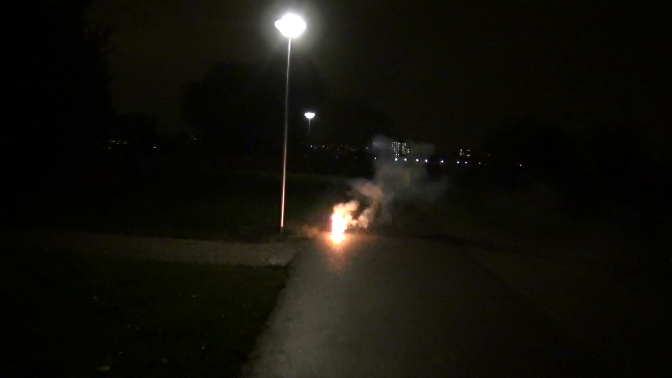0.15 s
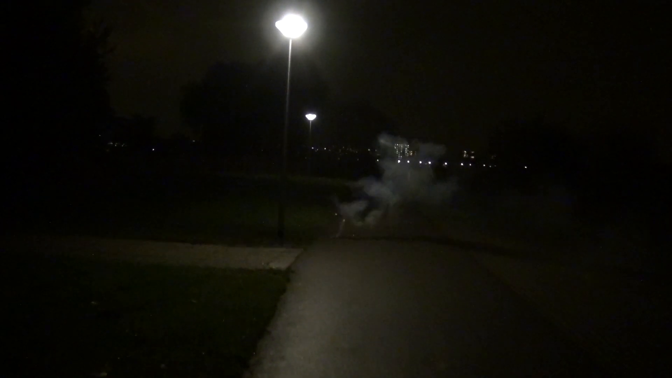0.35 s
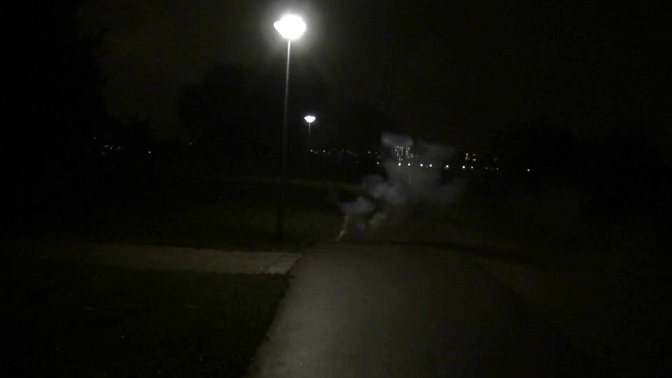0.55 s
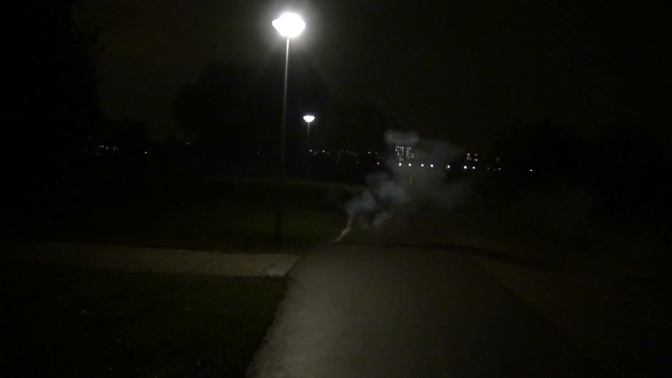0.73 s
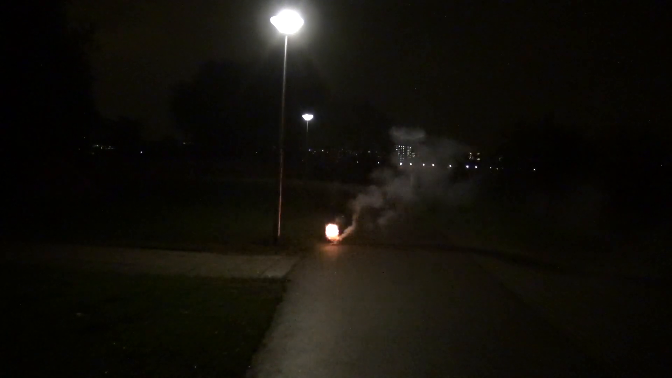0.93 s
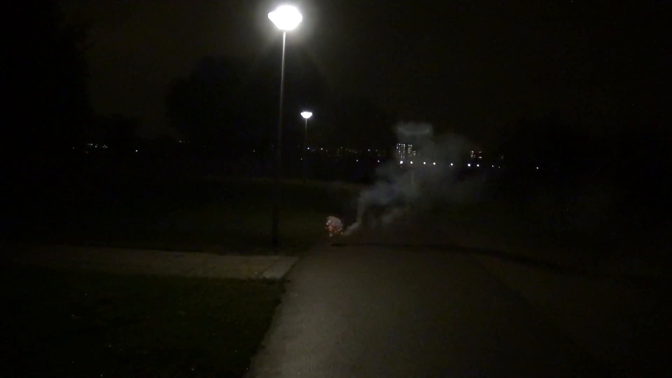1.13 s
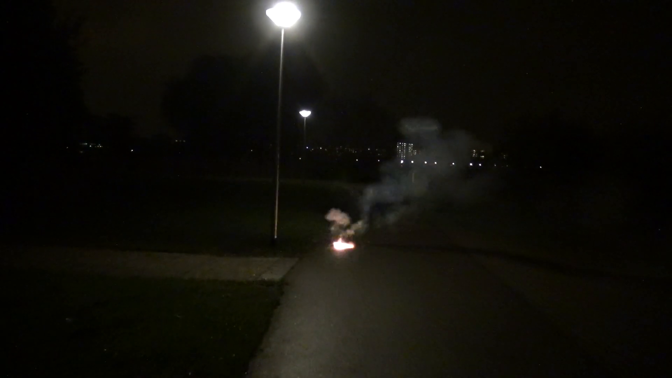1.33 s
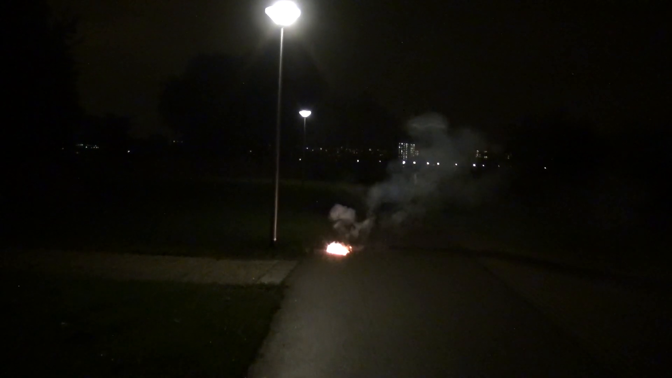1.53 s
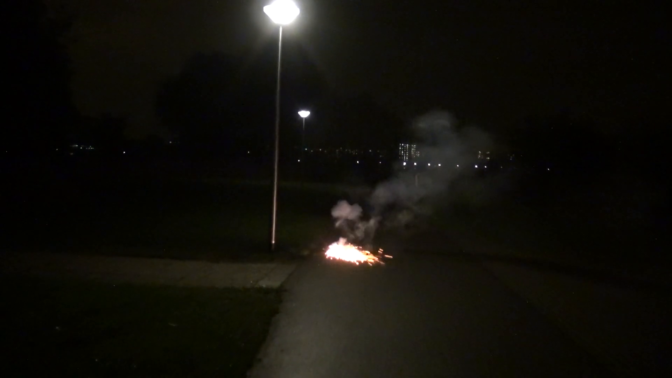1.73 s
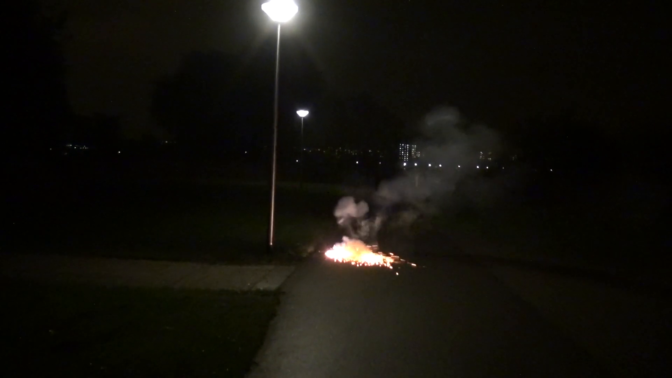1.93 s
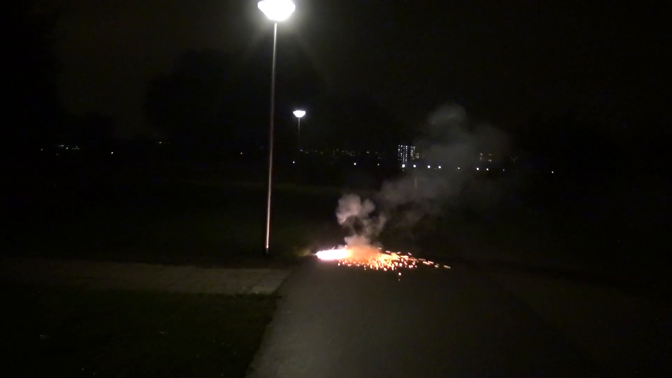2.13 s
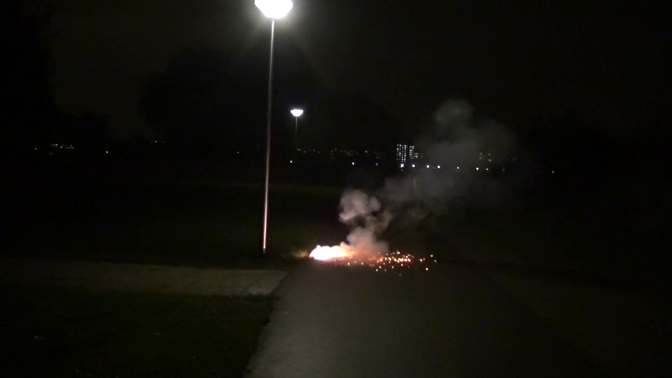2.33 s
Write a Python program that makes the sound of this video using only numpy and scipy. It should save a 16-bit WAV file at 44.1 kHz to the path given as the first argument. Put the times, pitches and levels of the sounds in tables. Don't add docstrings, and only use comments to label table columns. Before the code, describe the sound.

A firecracker bangs outdoors at night, a few metres from a stereo microphone. Faint distant traffic, light wind and the last echo of an earlier bang open it. Sharp, clipped cracks hit at 0.22, 0.92 and 1.42 seconds, each with a tick of grit, fast slapback and weaker far echoes. From 1.44 burning powder roars, strongest around 1.8 to 2.0, a dull pop at 1.93, spitting brighter near 2.08, then dying.

```python
import sys
import numpy as np
from scipy import signal
from scipy.fft import rfft, irfft, next_fast_len
from scipy.io import wavfile
from scipy.ndimage import uniform_filter1d

SR = 44100
rng = np.random.default_rng(int(sys.argv[2]) if len(sys.argv) > 2 else 0)


def nominal_scale(level):
    x = np.asarray(level, float) / 20
    return 10 ** x


def master(y):
    cut = np.clip(np.atleast_2d(y).T, -1, 1)
    pcm = np.round(cut * 32767)
    wavfile.write(sys.argv[1], SR, pcm.astype(np.int16))


N = 105840
LEAD = int(.4 * SR)


def colour(x, points):
    p, size = np.array(points), next_fast_len(x.shape[-1])
    hz = np.maximum(np.arange(size // 2 + 1) * SR / size, 1)
    gain = nominal_scale(np.interp(np.log(hz), np.log(p[:, 0]), p[:, 1]))
    return irfft(rfft(x, size) * gain, size)[..., :x.shape[-1]]


def unit(x):
    return x / np.sqrt(np.mean(x ** 2))


def pan(db):
    return nominal_scale(np.array([db, -db]) / 2)


def pair(mid, side, alike):
    c = np.clip(alike, 0, 1)
    return (np.sqrt(1 + c) * mid + np.sqrt(1 - c) * side * np.array([[1], [-1]])) / np.sqrt(2)


def walk(hz):
    hold = int(SR / hz)
    steps = np.repeat(rng.standard_normal(N // hold + 1), hold)
    return unit(uniform_filter1d(uniform_filter1d(steps, hold), hold)[:N])


def grains(count, spread_db, share=1.):
    size_draw, sounds_draw = rng.random((count, 2)).T
    sizes = nominal_scale(-spread_db * np.log(1 - size_draw))
    return unit(rng.standard_normal(count) * sizes * (sounds_draw < share))


# f/Hz, level/dB per Hz
NIGHT_COLOUR = [(25, -13.5), (130, 0.5), (200, -11), (280, -15.5), (450, -18), (1000, -16), (2600, -33),
                (15500, -51)]


def night():
    level_db, alike_hz, drift_db, drift_hz = -39.5, 2780, .8, 6.8
    out, base = 0, rng.standard_normal((2, N))
    for hz in 40 * 2. ** np.arange(9):
        top_hz = min(hz * np.sqrt(2) * (1 + (hz > 9e3)), 2e4)
        octave = signal.butter(2, [hz / np.sqrt(2), top_hz], "band", fs=SR, output="sos")
        band = signal.sosfilt(octave, base)
        alike = 1 / (1 + hz / alike_hz) - .08
        out = out + pair(band[0], band[1], alike) * nominal_scale(drift_db * walk(drift_hz))
    return unit(colour(out, NIGHT_COLOUR)) * nominal_scale(level_db)


def wind():
    level_db, top_hz, gust_db, gust_hz = -41, 60.5, 2, 3.5
    low = signal.sosfilt(signal.butter(2, top_hz, fs=SR, output="sos"), rng.standard_normal((2, N)))
    return unit(low) * nominal_scale(level_db + gust_db * walk(gust_hz))


# delay t/s, level/dB, left-right level/dB
SCATTER = [(.003, -17.5, 4), (0.029, -30, 18.5), (0.041, -14, 7.5), (0.063, -16, 5.5), (.15, -23.5, 4),
           (0.236, -28.5, 3), (0.254, -35.5, 3), (.34, -38.5, 1), (0.368, -36, 1.5), (.7, -46, -2.5)]
# f/Hz, level/dB
SCATTER_COLOUR = [(60, -15), (200, -9), (450, -4.5), (1000, -3), (2200, 10), (5000, 2.5), (10000, 0),
                  (15000, -15)]
ECHO_DELAYS = [.0123, .0160, .0228, .0330, .0465, .0790, .0840, .1045, .1460, .1820, .3595, .3960, .4025,
               .4290, .0838]
# level/dB, left-right level/dB, low edge f/Hz, high edge f/Hz, smear t/s
ECHOES = [(-2, -6, 1300, 8600, 0.000032), (-22, 5, 920, 7200, 0.000085), (-21, -28, 2600, 9700, 0.00023),
          (-17.5, -14, 46, 670, 0.00017), (-12, 4, 670, 1330, 0.0027), (-4.5, -10, 1040, 4400, 0.0036),
          (-8.5, 17, 123, 7500, 0.00085), (-9.5, 8, 1200, 6900, .001), (-5.5, 1, 1040, 7100, 0.0024),
          (-5, 5.5, 420, 2600, 0.0041), (-17, 1, 690, 4100, 0.0027), (-16.5, 2, 1400, 2400, 0.00085),
          (-21, 1, 1100, 1500, 0.0011), (-27.5, -13, 700, 2700, 0.0026), (-9.5, 3, 90, 520, 0.000044)]


def space():
    scatter_db, grain_db, alike, air_db_per_s_khz = -20.5, 1.8, 0.58, 0.77
    size = int(.8 * SR)
    t, s = np.arange(size) / SR, np.array(SCATTER)
    noise = colour(pair(grains(size, grain_db), grains(size, grain_db), alike), SCATTER_COLOUR)
    hz, at, z = signal.stft(noise, SR, nperseg=256)
    air = nominal_scale(-air_db_per_s_khz * np.outer(hz / 1000, at))
    noise = signal.istft(z * air, SR, nperseg=256)[1][:, :size]
    level = nominal_scale(np.interp(t, s[:, 0], s[:, 1], left=-99) + scatter_db)
    out = noise * level * pan(np.interp(t, s[:, 0], s[:, 2]))
    for delay_s, (db, pan_db, lo_hz, hi_hz, smear_s) in zip(ECHO_DELAYS, ECHOES):
        k = int(round(delay_s * SR))
        rough = rng.standard_normal(1024) * np.exp(-t[:1024] / smear_s)
        click = rough / np.sqrt(np.sum(rough ** 2)) * .45
        click[0] += 1 / np.sqrt(1 + smear_s / .0005)
        echo = signal.lfilter(*signal.butter(2, [lo_hz, hi_hz], "band", fs=SR), click)
        out[:, k:k + 1024] += nominal_scale(db) * np.outer(pan(pan_db), echo)
    return out


DEBRIS_TIMES = [
    .2226,
    .9243,
    .9272,
    1.4142,
    1.4178,
    1.4200,
]
# level/dB, decay t/s, dullness 0-1
DEBRIS = [(-2.5, .002, 0.41), (5, 0.0017, 0.73), (-1, 0.00082, 0.95), (1, 0.00072, 1), (3, 0.0019, 0.74),
          (3.5, 0.0045, 0.81)]


def debris():
    out, t = np.zeros((2, N)), np.arange(1500) / SR
    for s, (db, decay_s, dull) in zip(DEBRIS_TIMES, DEBRIS):
        k, pole = int(s * SR), min(dull, .95)
        grit = pair(*rng.standard_normal((2, 1500)), .55)
        out[:, k:k + 1500] += nominal_scale(db) * signal.lfilter([1 - pole], [1, -pole], grit) * np.exp(-t / decay_s)
    return signal.lfilter(*signal.butter(2, 700, "high", fs=SR), out)


FIZZ_TIMES = [1.44, 1.59, 1.71, 1.82, 1.96, 1.985, 2.075, 2.118, 2.14, 2.22, 2.4]
# roar level/dB, spitting level/dB over the roar
FIZZ_LEVELS = [(-31.5, 0), (-30.5, -12.5), (-28, -8.5), (-24, -16.5), (-24, -12), (-24.5, -8.5), (-27, -3),
               (-26.5, -8), (-30.5, -11), (-33.5, -16), (-40.5, -15)]
# f/Hz, level/dB per Hz
ROAR_COLOUR = [(35, -34), (60, -16), (146, -7), (182, -0.5), (306, -2), (665, 0), (1470, -4.5), (5000, -59),
               (6500, -60), (11000, -120)]
# f/Hz, level/dB per Hz
SPIT_COLOUR = [(600, 6), (2000, 10.5), (3500, 2.5), (8000, -6.5), (11000, -13), (13000, -22), (16000, -32)]
# t/s, level/dB, f/Hz
POP = (1.928, -13, 220)


def puffs():
    return grains(N, 1.3, 3000 / SR) + 0.94 * rng.standard_normal(N)


def fizz():
    flicker_db, flicker_hz, roar_db, spit_db, spit_grain_db = .9, 60, 0, 3, 1.2
    ember_db, ember_hz, pop_decay_s = -53, 7000, .0016
    t, levels = np.arange(N) / SR, np.array(FIZZ_LEVELS)
    lit = np.clip((t - FIZZ_TIMES[0] + .02) / .03, 0, 1)
    hiss = signal.lfilter(*signal.butter(1, ember_hz, "high", fs=SR), rng.standard_normal((2, N)))
    embers = nominal_scale(ember_db) * lit * hiss
    burning = lit * nominal_scale(np.interp(t, FIZZ_TIMES, levels[:, 0]) + flicker_db * walk(flicker_hz))
    roar = unit(colour(pair(puffs(), puffs(), 0.99), ROAR_COLOUR))
    spit = unit(colour(pair(grains(N, spit_grain_db), grains(N, spit_grain_db), 0.97), SPIT_COLOUR))
    spitting = nominal_scale(spit_db + np.interp(t, FIZZ_TIMES, levels[:, 1])) * spit
    pop_s, pop_db, pop_hz = POP
    late = np.maximum(t - pop_s, 0)
    pop = -nominal_scale(pop_db) * np.sin(2 * np.pi * pop_hz * late) * np.exp(-late / pop_decay_s)
    return burning * (nominal_scale(roar_db) * roar + spitting) + pop + embers


BANG_TIMES = [
    -.335,
    .2223,
    .9240,
    1.4197,
]
# crack level/dB, crack ring f/Hz, thump level/dB, snap level/dB
BANGS = [(-2, 1270, -3, 4.5), (1, 1180, -2, 6.5), (4, 1260, -9, 13), (-2.5, 470, -15, -2)]


def bangs(thump_gain_db, crack_gain_db):
    crack_s, snap_s = .00075, .0001
    under_ratio, under_db, under_s = 0.66, -2, 0.00077
    thump_hz, thump_s, thump_late_s = 200, .0016, .0007
    out, t = np.zeros(N + LEAD), np.arange(1500) / SR
    late = np.maximum(t - thump_late_s, 0)
    thump = np.sin(2 * np.pi * thump_hz * late) * late / thump_s * np.exp(1 - late / thump_s)
    snap = (1 - t / snap_s) * np.exp(-t / snap_s)
    for s, (crack_db, hz, thump_db, snap_db) in zip(BANG_TIMES, BANGS):
        k = int(round(s * SR)) + LEAD
        ring = np.cos(2 * np.pi * hz * t - .7) * np.exp(-t / crack_s)
        ring += nominal_scale(under_db) * np.cos(2 * np.pi * under_ratio * hz * t) * np.exp(-t / under_s)
        crack = ring * (1 - np.exp(-t / snap_s / 2))
        out[k:k + 1500] += nominal_scale(crack_db + crack_gain_db) * crack
        out[k:k + 1500] += nominal_scale(snap_db) * snap - nominal_scale(thump_db + thump_gain_db) * thump
    return out


def scene():
    direct_db, direct_thump_db, far_crack_db, fizz_echo_db = 9, -11, -3, -20.5
    send, spray = bangs(0, far_crack_db), fizz()
    send[LEAD:] += nominal_scale(fizz_echo_db) * spray.mean(axis=0)
    echoes = signal.fftconvolve(send[None], space(), axes=1)[:, LEAD:LEAD + N]
    direct = nominal_scale(direct_db) * bangs(direct_thump_db, 0)[LEAD:]
    return direct + debris() + echoes + spray + night() + wind()


def band_limit(x):
    return signal.sosfilt(signal.butter(12, 16390, fs=SR, output="sos"), x)


def record(dry):
    mic_low_hz, ceiling, top_hz = 59, .99, 15900
    x = signal.sosfilt(signal.butter(1, mic_low_hz, "high", fs=SR, output="sos"), dry)
    x = np.clip(x, -ceiling, ceiling)
    x = signal.sosfilt(signal.ellip(6, .2, 60, top_hz, fs=SR, output="sos"), x)
    return band_limit(np.clip(x, -1, 1))


dry = scene()
out = record(dry)
master(out)
```